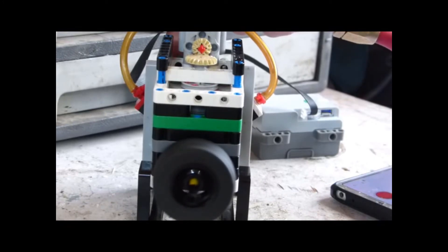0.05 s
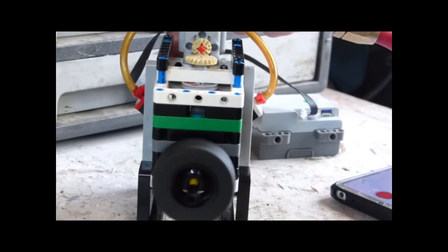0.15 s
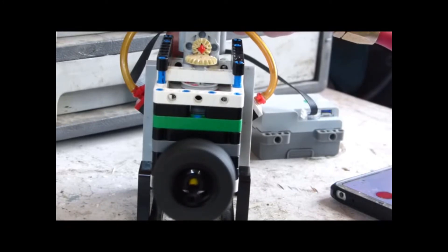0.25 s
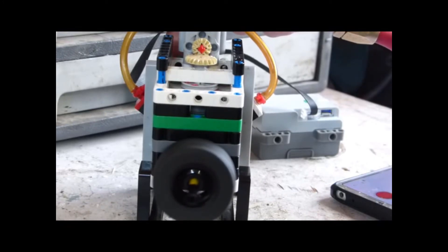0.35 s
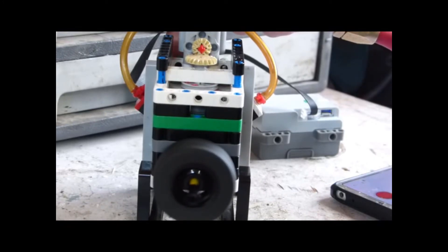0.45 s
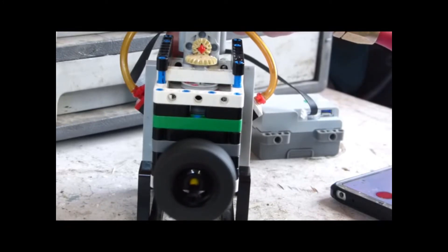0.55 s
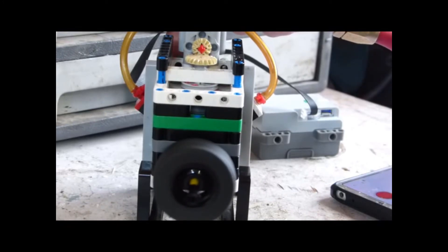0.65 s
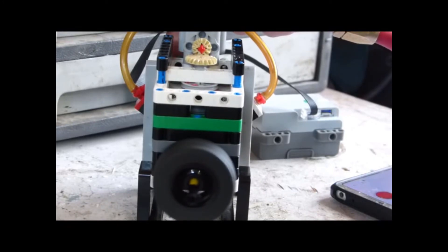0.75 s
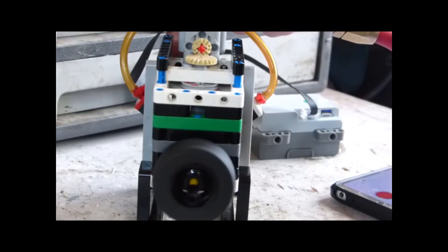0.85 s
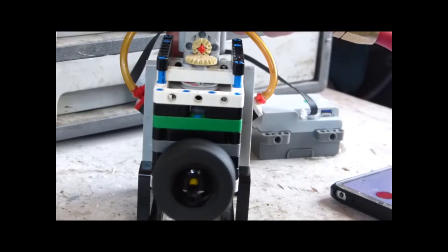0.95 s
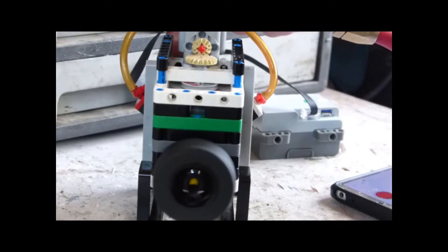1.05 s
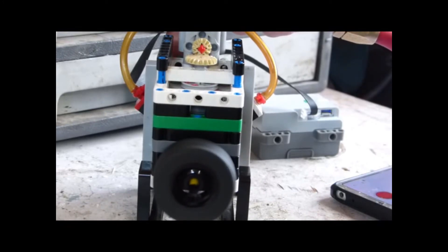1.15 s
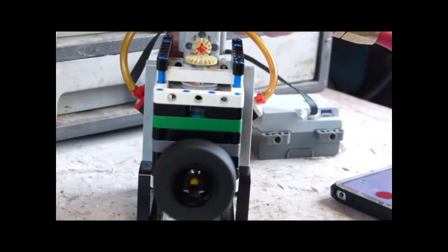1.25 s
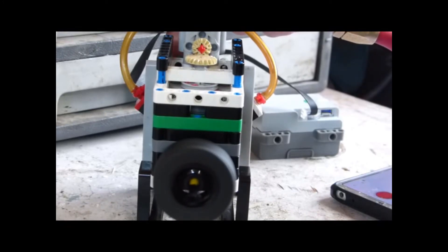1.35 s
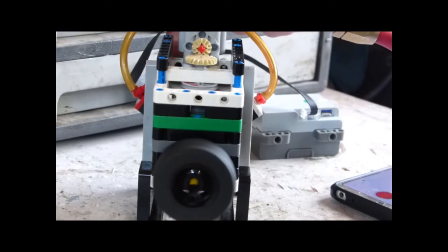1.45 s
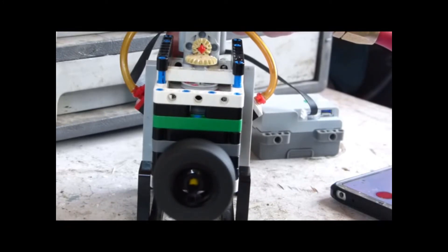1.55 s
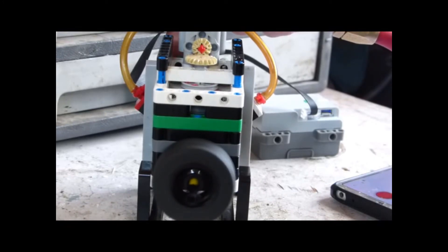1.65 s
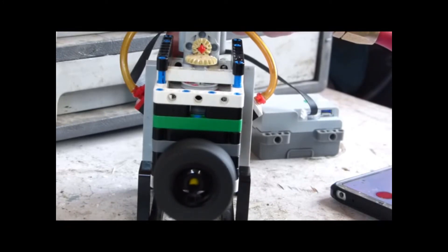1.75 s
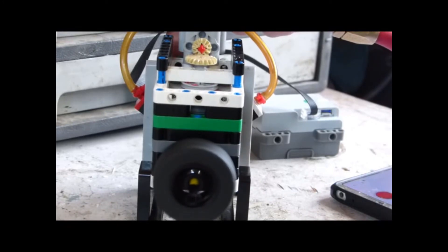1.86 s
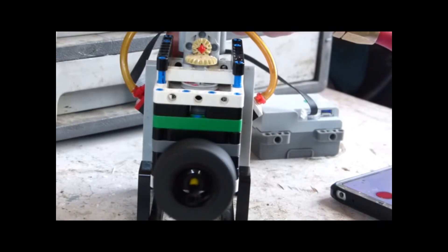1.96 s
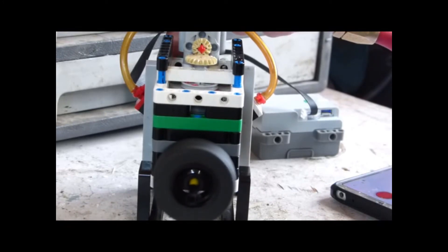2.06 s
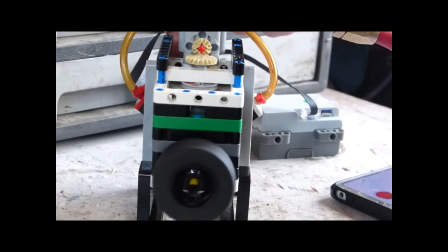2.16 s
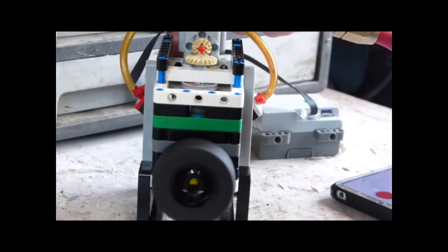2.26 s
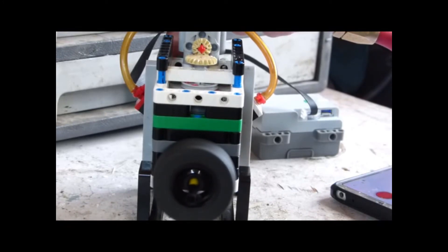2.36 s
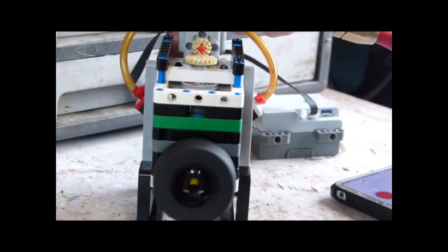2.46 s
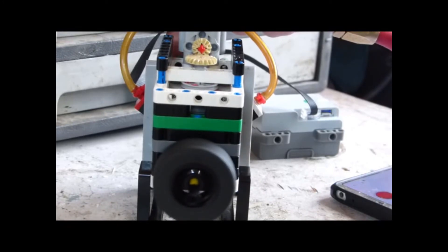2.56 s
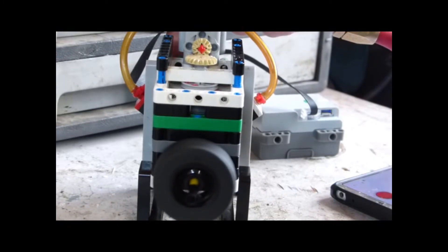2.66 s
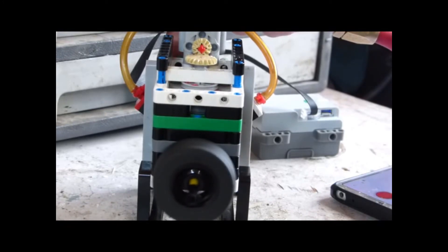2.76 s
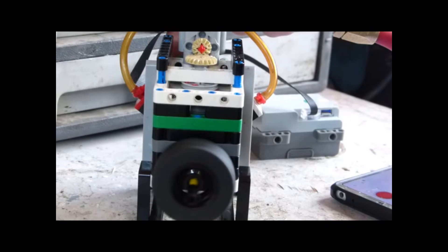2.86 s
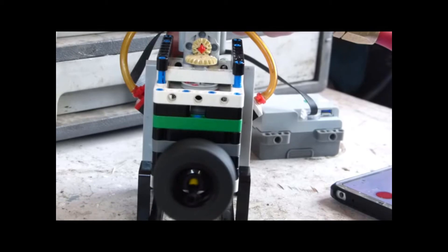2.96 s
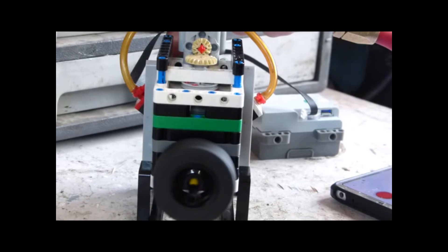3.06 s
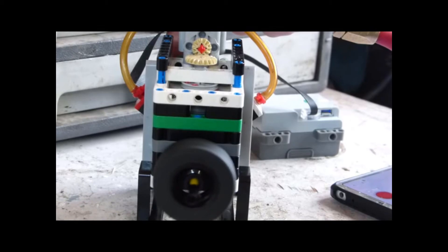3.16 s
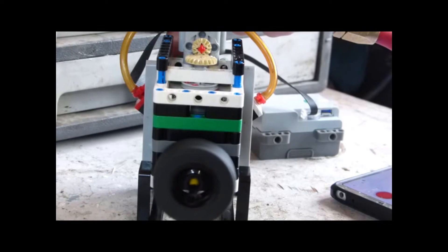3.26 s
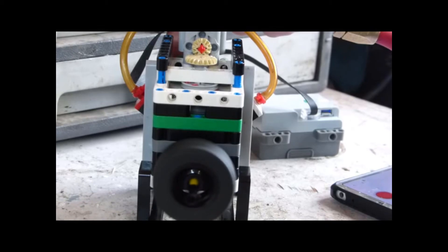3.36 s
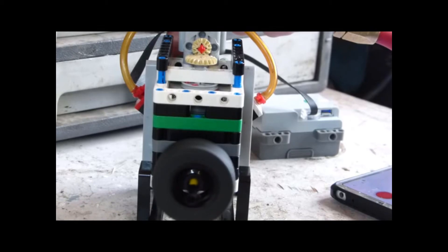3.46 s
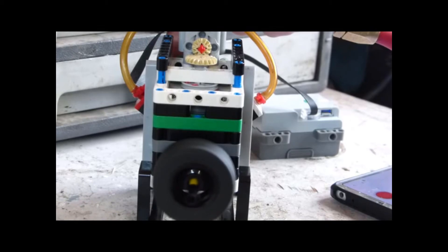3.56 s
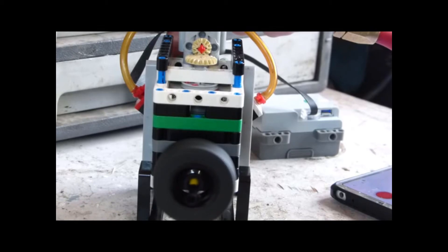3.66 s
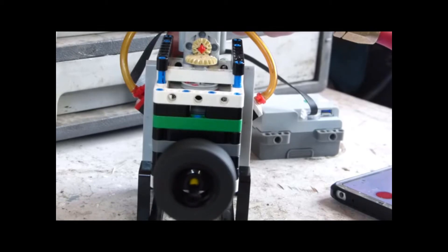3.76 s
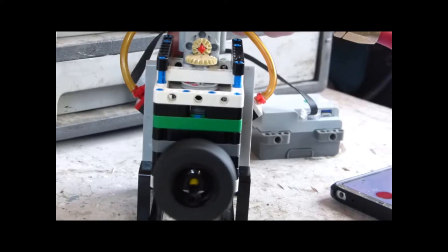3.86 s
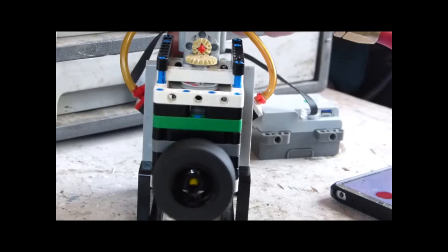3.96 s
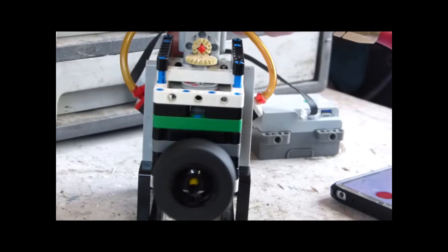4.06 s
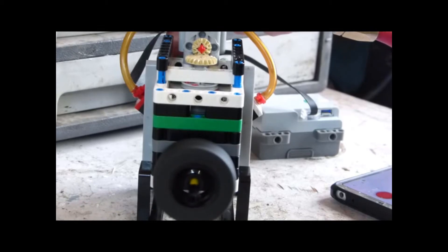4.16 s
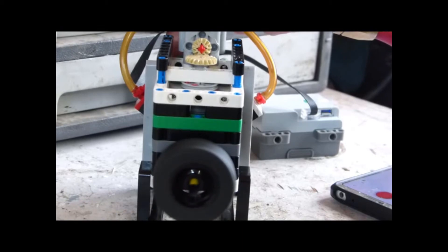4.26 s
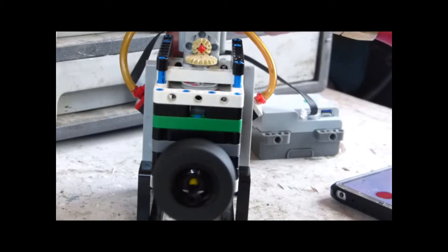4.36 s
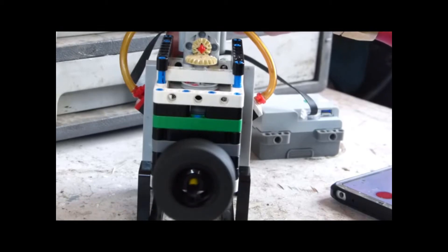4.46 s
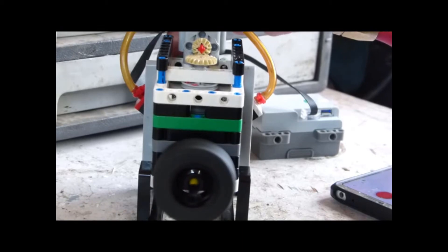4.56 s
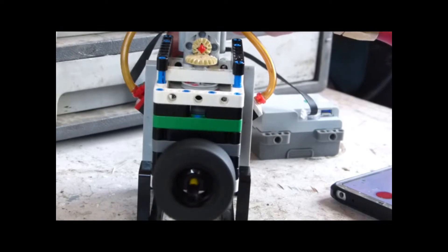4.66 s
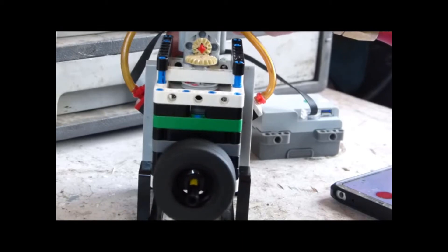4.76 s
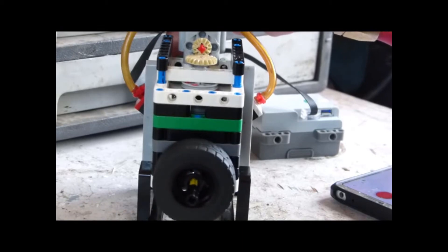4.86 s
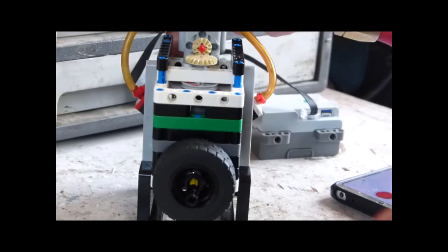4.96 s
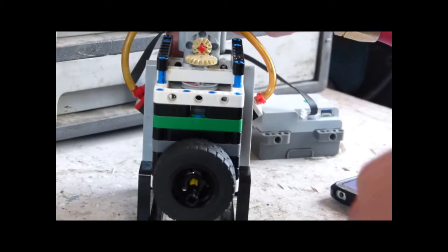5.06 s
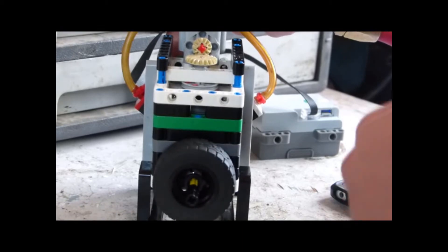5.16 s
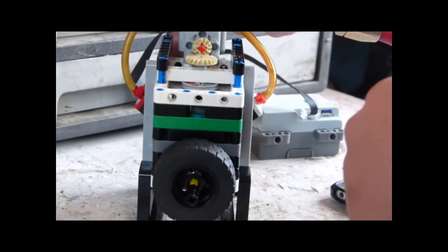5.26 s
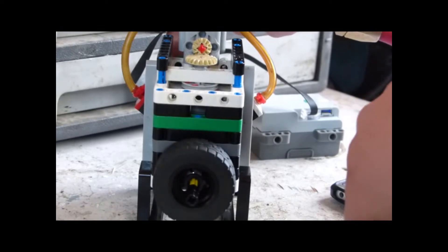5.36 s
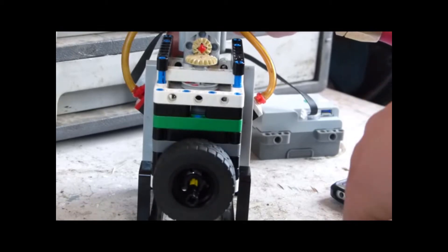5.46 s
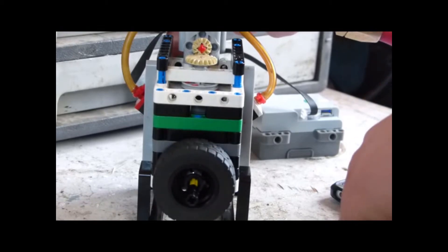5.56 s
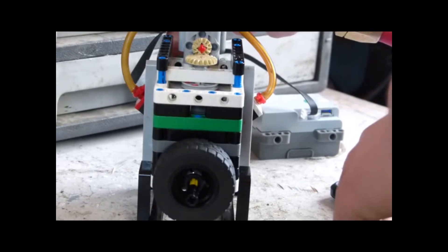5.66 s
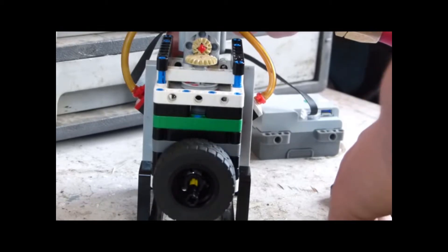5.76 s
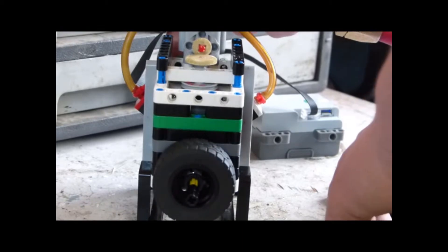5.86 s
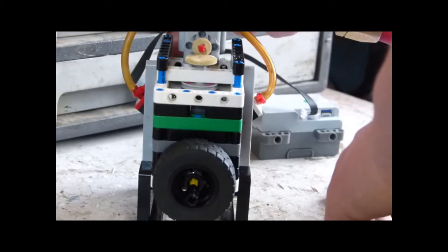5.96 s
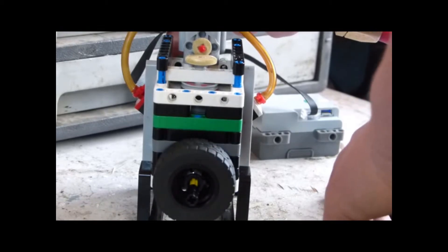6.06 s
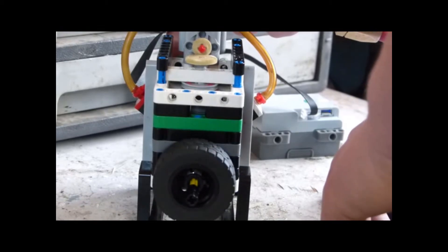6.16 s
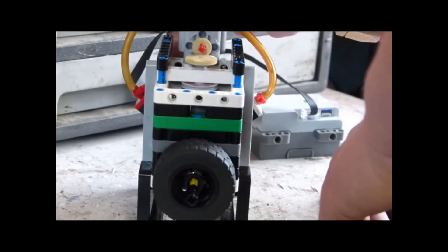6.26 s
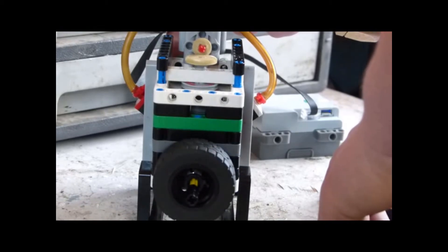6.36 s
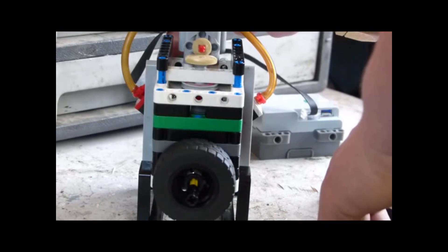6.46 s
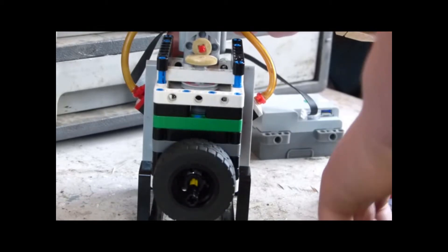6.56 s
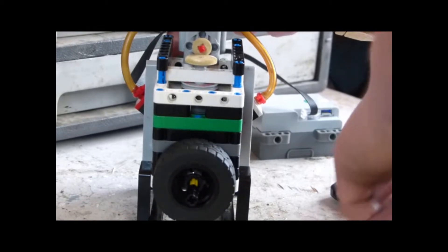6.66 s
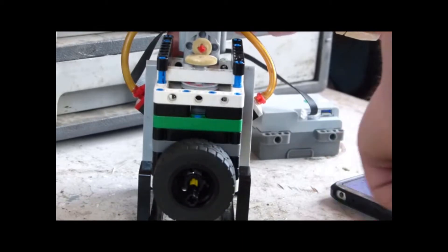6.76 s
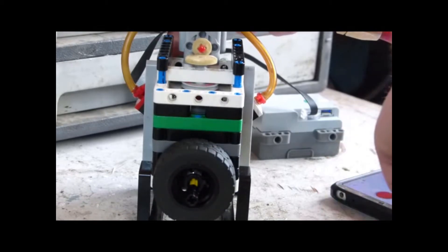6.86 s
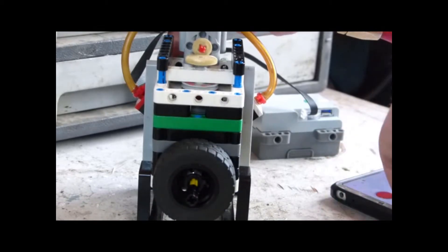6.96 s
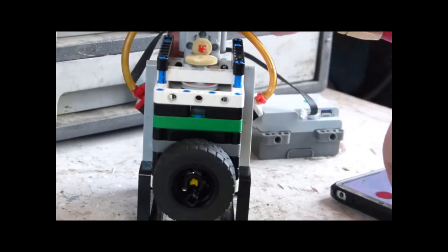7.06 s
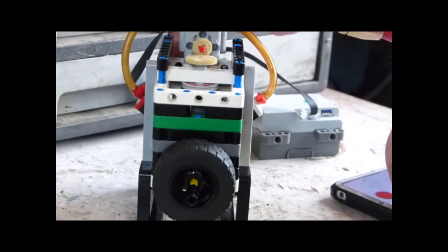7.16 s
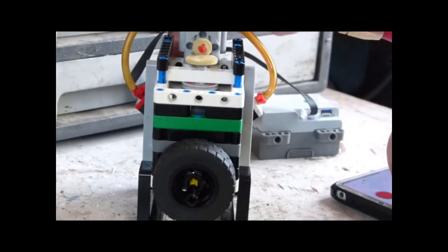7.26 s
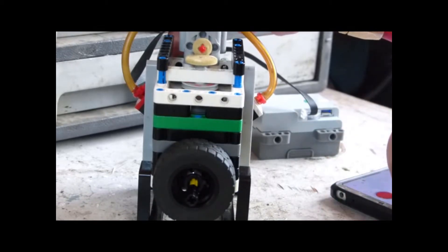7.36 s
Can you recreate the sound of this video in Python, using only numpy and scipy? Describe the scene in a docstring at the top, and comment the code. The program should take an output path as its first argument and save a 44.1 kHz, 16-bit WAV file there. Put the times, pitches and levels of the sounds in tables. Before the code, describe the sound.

A small plastic toy air engine clatters fast with hissing air, stalls, and a second later a small geared electric motor whirs on.

```python
"""Toy air engine and geared motor

An air engine of plastic bricks runs at about 38 turns a second on a table in a small room. Each turn
shakes the frame, ticks the linkage, clicks the valve, slaps the piston at both ends and puffs out air.
The air is shut off and the engine stalls. A second later a small electric motor starts and whirrs on,
its gears rasping once a turn and whining at multiples of the shaft speed."""
import sys
import numpy as np
from scipy import signal
from scipy.fft import rfft, irfft, next_fast_len
from scipy.io import wavfile
from scipy.ndimage import map_coordinates

SR = 44100
rng = np.random.default_rng(int(sys.argv[2]) if len(sys.argv) > 2 else 0)


def output_pcm(signal):
    """Save a mono or channel-first signal as 16-bit PCM at the path in sys.argv[1].

    Samples are clipped to [-1, 1] before scaling.
    """
    pcm = np.clip(np.atleast_2d(signal).T, -1, 1) * 32767
    wavfile.write(sys.argv[1], SR, np.round(pcm).astype(np.int16))


N = 327222

# piston reversals: (crank position [turns], spread [turns], relative slap [dB], relative puff [dB])
REVERSALS = [(.13, .048, -0.5, -2.5), (.825, 0.03902, 3.5, 2)]
# spectrum of a hard blow on plastic: (frequency [Hz], gain [dB])
CRACK_SPECTRUM = [(300, -19), (900, -14.5), (1700, -11), (3100, -7), (4100, -7), (6000, -6.5), (7200, 3.5),
                  (8300, -1.5), (9300, -2), (10400, 2.5)]


def amp(db):
    """Amplitude ratio of a level in decibels."""
    return 10 ** (np.asarray(db) / 20)


def unit(x):
    """Normalisation to rms 1."""
    return x / np.sqrt(np.mean(x ** 2) + 1e-20)


def along(points, hz):
    """Interpolation of (frequency [Hz], value) points on a logarithmic frequency axis."""
    frequencies, values = np.transpose(points)
    return np.interp(np.log(hz + 1), np.log(frequencies + 1), values)


def seconds():
    """The time of every sample."""
    return np.arange(N) / SR


def since(start):
    """Seconds since start, zero before it."""
    return np.maximum(seconds() - start, 0)


def ramp(start_s, length_s):
    """A linear rise from 0 to 1."""
    return np.minimum(since(start_s) / length_s, 1)


def wobble(rate):
    """Smooth random modulation: a spline through `rate` Gaussian values a second."""
    return map_coordinates(rng.standard_normal(int(N * rate / SR) + 4), [np.arange(N) * rate / SR])


def filtered(x, response):
    """Linear filtering: the spectrum of x times a complex frequency response."""
    size = next_fast_len(N + SR // 2)
    return irfft(rfft(x, size) * response(np.fft.rfftfreq(size, 1 / SR)), size)[..., :N]


def coloured(x, spectrum):
    """Spectral shaping by (frequency [Hz], gain [dB]) points, at rms 1."""
    return unit(filtered(x, lambda hz: amp(along(spectrum, hz))))


def passes(turns, position):
    """Sample times at which a shaft passes one angular position."""
    return np.interp(np.arange(int(turns[-1])) + position, turns, np.arange(N))


def impulses(at, sizes):
    """Band-limited impulses: windowed sinc pulses at fractional sample times."""
    taps = np.floor(at)[:, None] + np.arange(-7, 9)
    lag = taps - at[:, None]
    pulse = np.sinc(lag) * np.sinc(lag / 8) * sizes[:, None]
    return np.bincount(np.clip(taps, 0, N).astype(int).ravel(), pulse.ravel(), N + 1)[:N]


def ring(x, decay_s, rise_s=0.00055):
    """Convolution with the impulse response of a part with many close modes: a swell, then decay."""
    t = np.arange(SR // 16) / SR
    envelope = amp(-60 * t / decay_s) * (1 - np.exp(-t / rise_s)) ** 2
    modes = rfft(rng.standard_normal(len(t)) * envelope)
    response = irfft(modes / np.sqrt(np.abs(modes)))[:len(t) // 2]  # evens out the modes' strengths
    return signal.fftconvolve(x, response / np.linalg.norm(response))[:N]


def contacts(turns, table, decay_s, jitter_ms, scatter_db):
    """Periodic impacts: each (position [turns], level [dB]) excites its own ring once a turn."""
    out = np.zeros(N)
    for position, db in table:
        at = passes(turns, position)
        delay, strength = rng.standard_normal((len(at), 2)).T
        blows = impulses(at + delay * jitter_ms * SR / 1000, amp(db + scatter_db * strength))
        out += ring(blows, decay_s)
    return unit(out)


def background():
    """Ambient noise: a broadband floor, narrow bands heard as wavering tones, and a faint hiss."""
    # room noise: (frequency [Hz], relative spectral density [dB])
    noise_spectrum = [(25, -16), (90, -18.5), (190, 1), (300, -4.5), (470, -4), (700, 0), (950, -0.5),
                      (1130, -4), (1270, -2), (1450, -9.5), (1680, -7.5), (2100, -15), (3600, -24),
                      (10400, -50)]
    # wavering tones: (frequency [Hz], level [dB])
    hum_tones = [(253.0, -68), (393.0, -65.5), (694.4, -62.5), (748.3, -68.5), (850.6, -67), (915.2, -63),
                 (952.8, -67), (1217, -67.5)]
    # hiss: (frequency [Hz], relative spectral density [dB])
    hiss_spectrum = [(2500, -27.5), (4300, -11.5), (5050, -6.5), (5400, 0.5), (5650, -5), (6200, -3.5),
                     (7000, -8), (8600, -5.5), (10400, -7.5)]
    hum = np.zeros(N)
    for hz, db in hum_tones:
        phase = 2 * np.pi * hz * seconds()
        hum += amp(db + 0.5) * (wobble(12) * np.sin(phase) + wobble(14) * np.cos(phase))
    hiss = amp(-60) * coloured(rng.standard_normal(N), hiss_spectrum)
    floor = amp(-53.5) * coloured(rng.standard_normal(N), noise_spectrum) * amp(0.79 * wobble(6))
    return floor + hum + hiss


def pressure(shut_off_s=5.125, bleed_s=.123):
    """Share of the driving pressure: full until shut-off, then a Gaussian fall as air bleeds away."""
    return np.exp(-(since(shut_off_s) / bleed_s) ** 2)


def drag(start_s=4.2747, build_s=.3013, release_s=.4204):
    """A passing load on the crank, 0 to 1: linear build-up, then exponential relaxation."""
    return ramp(start_s, build_s) * np.exp(-since(start_s + build_s) / release_s)


def crank(start_hz=38.6612, sag_hz_per_s=.0949, drag_hz=.8381, coast_power=.12):
    """Turns as the integral of speed, which sags, dips under drag and runs down with the pressure."""
    speed = start_hz - sag_hz_per_s * seconds() - drag_hz * drag()
    return np.cumsum(speed * pressure() ** coast_power) / SR


def frame_purr(turns, knock_position=.87, creep_mid_s=4.2, creep_s=.5, ease_db_per_s=0.69):
    """Forced vibration: one knock a turn drives the frame at harmonics of the crank speed."""
    # frame harmonics before it creeps into a new stance: (crank multiple, relative level [dB])
    early_harmonics = [(1, -28), (2, -27), (3, -26), (4, -20), (5, -16), (6, -22), (7, -18), (8, -24),
                       (9, -11), (10, -9), (11, -5), (12, -9), (13, -11), (14, 0), (15, -3), (16, -10),
                       (17, -8), (18, -11), (19, -9), (20, -18), (21, -15), (22, -13), (23, -19)]
    # frame harmonics once it has crept: (crank multiple, relative level [dB])
    crept_harmonics = [(1, -25), (2, -24), (3, -22), (4, -21), (5, -12), (6, -20), (7, -15), (8, -15),
                       (9, -9), (10, -5), (11, -1), (12, -7), (13, -7), (14, 0), (15, -2), (16, -11),
                       (17, -10), (18, -9), (19, -6), (20, -14), (21, -11), (22, -8), (23, -17)]
    # harmonics of the thin panels: (crank multiple, relative level [dB])
    panel_harmonics = [(29, -14), (37, -10), (50, -13)]
    creep = 1 / (1 + np.exp((creep_mid_s - seconds()) / creep_s))
    # the harmonics fall out of step as the engine labours
    stumble_rad = 0.81 * np.sqrt(1 - pressure()) + 0.2 * drag()
    purr = np.zeros(N)
    for order, db in [*early_harmonics, *panel_harmonics]:
        level_db = db + creep * (dict(crept_harmonics).get(order, db) - db)
        lag = rng.uniform(-1.3, 1.3) + stumble_rad * wobble(30)  # each has its own path through the bricks
        purr -= amp(level_db) * np.sin(2 * np.pi * order * (turns - knock_position) + lag)
    return unit(purr) * amp(-33.5 - ease_db_per_s * seconds() + 0.34 * wobble(25)) * pressure()


def linkage_ticks(turns):
    """Impact excitation: the linkage touches at set crank angles and its plastic rings."""
    # linkage contacts: (crank position [turns], relative level [dB])
    ticks = [(.11, -2), (0.379, 7), (.425, 1.5), (0.465, -11.5), (0.549, -2.5), (.59, 4), (.655, -4),
             (0.699, -3.5), (.80, -2)]
    # response of the plastic: (frequency [Hz], gain [dB])
    plastic_spectrum = [(200, -24.5), (600, -17.5), (950, -6.5), (1300, -3), (1600, -1.5), (2400, -6.5),
                        (3000, -9), (3700, -3), (4200, -7), (5600, 3), (7200, -1), (8400, 1.5),
                        (10400, -12)]
    ringing = contacts(turns, ticks, decay_s=0.022, jitter_ms=0.058, scatter_db=2.0)
    return amp(-31) * coloured(ringing, plastic_spectrum)


def valve_clicks(turns):
    """Damped free vibration: the valve strikes three times a turn and rings briefly in the treble."""
    # valve contacts: (crank position [turns], relative level [dB])
    clicks = [(.035, -21), (.38, 2), (.65, 6.5)]
    # response of the valve: (frequency [Hz], gain [dB])
    valve_spectrum = [(2000, -29), (6000, -34), (7500, -1), (8500, 3.5), (9400, 2.5), (10400, -16)]
    ringing = contacts(turns, clicks, decay_s=0.0092, jitter_ms=.007, scatter_db=1.5)
    return amp(-30.5) * coloured(ringing, valve_spectrum)


def piston_slap(turns, scatter_db=3, turn_scatter_db=3.5, blow_count=10):
    """Modal excitation: the loose piston chatters at each reversal, ringing the bricks in a new mix."""
    # brick resonances: (frequency [Hz], bandwidth [Hz], relative level [dB])
    brick_modes = [(1620, 190, -2.5), (1928, 170, -0.5), (2298, 190, -0.5), (2567, 80, -5.5),
                   (4104, 130, 2), (4825, 160, -1), (5620, 430, 1), (6720, 500, 0)]
    times, sizes = [], []
    for position, spread, slap_db, _ in REVERSALS:
        at = passes(turns, position)
        force_db = slap_db + turn_scatter_db * rng.uniform(-0.93, 1, (len(at), 1))
        offset = rng.uniform(-2, 2, (len(at), blow_count))
        times.append(at[:, None] + spread * np.median(np.diff(at)) * offset)
        blow_db = force_db + scatter_db * rng.uniform(-0.9, 1, offset.shape)
        sizes.append(amp(blow_db) / (1 + .5 * offset ** 2))  # strongest in mid-reversal
    times, sizes = np.ravel(times), np.ravel(sizes)

    def blows():
        """The same impact times with fresh random weights and signs."""
        return impulses(times, sizes * rng.uniform(-1.08, 1, len(times)))

    bricks = np.zeros(N)
    for centre, width, db in brick_modes:
        mode = filtered(blows(), lambda hz: 1j * hz * width / (centre ** 2 - hz ** 2 + 1j * hz * width))
        bricks += amp(db) * unit(mode)
    crack = coloured(ring(blows(), decay_s=0.005), CRACK_SPECTRUM)
    return amp(-32) * unit(bricks) + amp(-27.5) * crack


def exhaust(turns, leak=0.49, widen=1.16):
    """Flow noise: a steady leak and a puff at each reversal modulate the hiss of escaping air."""
    # escaping air: (frequency [Hz], relative spectral density [dB])
    air_spectrum = [(25, -19.5), (150, -21.5), (450, -11), (1000, -11.5), (1900, -6.5), (3100, -7),
                    (5300, -3), (7200, -6.5), (8200, 0), (9300, -4), (9800, -1.5), (10400, -6)]
    flow = np.full(N, leak)
    for position, spread, _, puff_db in REVERSALS:
        turns_away = (turns - position + .5) % 1 - .5
        flow += amp(puff_db) * np.exp(-.5 * (turns_away / (widen * spread)) ** 2)
    hiss = coloured(rng.standard_normal(N), air_spectrum)
    return amp(-26.5) * unit(flow * hiss * amp(1.5 * wobble(60)))


def stall_clack():
    """An impact transient: the linkage catches once as the engine stalls."""
    # the blow of the catch, ahead of the plastic's response: (time [s], level [dB])
    catches = [(5.2298, 5.5)]
    at_s, db = np.transpose(catches)
    ringing = ring(impulses(at_s * SR, amp(db)), decay_s=.005)
    return filtered(ringing, lambda hz: amp(along(CRACK_SPECTRUM, hz)))


def motor(switch_on_s=6.36, spin_up_s=.037, full_hz=164.95):
    """First-order spin-up: the motor nears full speed exponentially. Returns gear rasp and whine."""
    speed = 1 - np.exp(-since(switch_on_s) / spin_up_s)  # share of full speed
    bite = ramp(start_s=6.377, length_s=.012)  # the gears take up their slack
    level = amp(-29) * bite * speed ** 0.64
    turns = np.cumsum(full_hz * speed * (1 + .0005 * wobble(30))) / SR
    at_speed = speed ** 14  # rumble and whine build up only near full speed
    return level * amp(-5) * gear_rasp(turns, at_speed), level * at_speed * gear_whine(turns)


def gear_rasp(turns, at_speed, rub_depth=0.42):
    """Friction and impact: teeth rub and tick each turn, exciting the hollow gearbox's resonances."""
    # response of the motor case: (frequency [Hz], gain [dB])
    case_spectrum = [(25, -42), (90, -34), (160, -23), (420, -9.5), (1100, -16.5), (1800, -11.5),
                     (2500, -11.5), (3200, -18.5), (4300, -8.5), (4900, -5.5), (6200, -4.5), (6950, -9),
                     (8500, 1.5), (10300, -10.5)]
    teeth = contacts(turns, [(0, -2.5), (.45, 2)], decay_s=0.0054, jitter_ms=0.034, scatter_db=2.5)
    teeth = coloured(teeth, [(1500, -9.5), (4500, -5.5), (8000, 6)])
    rub = unit(rng.standard_normal(N) * (1 + rub_depth * np.cos(2 * np.pi * (turns - .2))))
    gearbox = amp(-3) * ring(rub, decay_s=0.01)
    rasp = coloured(gearbox + rub + amp(-6) * teeth, case_spectrum)
    rumble = filtered(rasp, lambda hz: 1 / (1 + (hz / 3500) ** 4))
    return rasp - (1 - np.sqrt(at_speed)) * rumble


def gear_whine(turns):
    """Gear-mesh tones: wavering partials at multiples of the shaft speed, whose balance settles."""
    # partials: (motor multiple, level at first [dB], level once run in [dB]), relative to the motor
    partials = [(1, -32, -33), (3, -29, -27), (8.51, -32, -28), (15, -31, -35), (28, -25, -25),
                (44, -20, -21), (46, -23, -20), (49, -21, -19), (50, -11, -12), (51, -10, -13),
                (54, -18, -9), (56.15, -20, -17), (57.15, -18, -18), (59, -15, -13), (60, -19, -18)]
    run_in = ramp(start_s=6.7, length_s=.3)
    whine = np.zeros(N)
    for order, first_db, settled_db in partials:
        rms = amp(first_db + run_in * (settled_db - first_db) + 2 * wobble(7))
        whine += np.sqrt(2) * rms * np.sin(2 * np.pi * order * turns + .2 * wobble(60))
    return whine


def room(x):
    """Reverberation: diffuse reflections begin after 5 ms and decay exponentially in each band."""
    # reverberation times: (frequency [Hz], time to fall 60 dB [s])
    decay_times = [(200, 0.24), (2000, 0.58), (10000, 0.42)]
    hz, t, bands = signal.stft(rng.standard_normal(SR // 2), SR, nperseg=256)
    tail = signal.istft(bands * amp(-60 * t / along(decay_times, hz)[:, None]), SR)[1]
    delayed = np.pad(x, (SR // 200, 0))
    return signal.fftconvolve(delayed, tail / np.linalg.norm(tail))[:N]


def scene():
    """Superposition in mid-side stereo: engine, then motor, nearly alike in both channels."""
    # share of the reverberation that differs between left and right: (frequency [Hz], gain [dB])
    side_spectrum = [(60, -51), (96, -43), (150, -37), (250, -31), (400, -17.5), (640, -20.5),
                     (1030, -22.5), (1650, -35.5), (2650, -29), (4250, -23.5), (6830, -30.5), (11000, -18)]
    turns = crank()
    rasp, whine = motor()
    clatter = linkage_ticks(turns) + valve_clicks(turns) + piston_slap(turns) + exhaust(turns)
    noises = clatter * pressure() + stall_clack() + rasp
    machines = noises + frame_purr(turns) + whine + amp(-5) * room(noises)
    mid = machines + background()
    side = filtered(room(machines), lambda hz: amp(along(side_spectrum, hz)))
    side += amp(-17.5) * background()  # room noise arrives from all round
    return np.array([mid + side, mid - side])


def record(dry):
    """Band limiting: a steep low-pass removes the highest treble."""
    cutoff_hz = 10350
    return filtered(dry, lambda hz: amp(-np.clip((hz - cutoff_hz) / 10, 0, 120)))


dry = scene()
out = record(dry)
output_pcm(out)
```